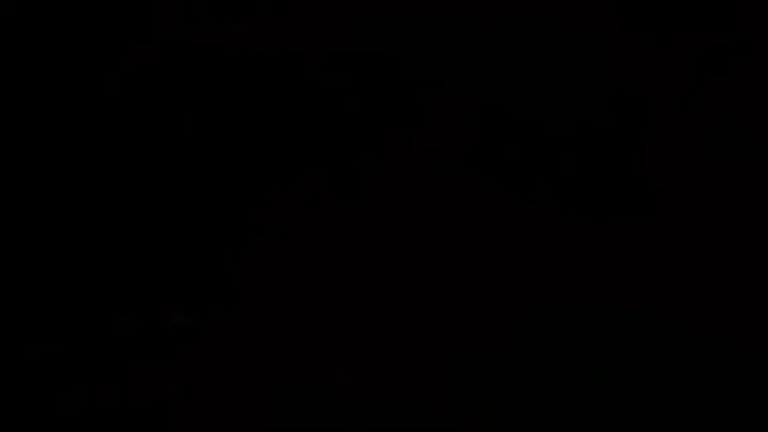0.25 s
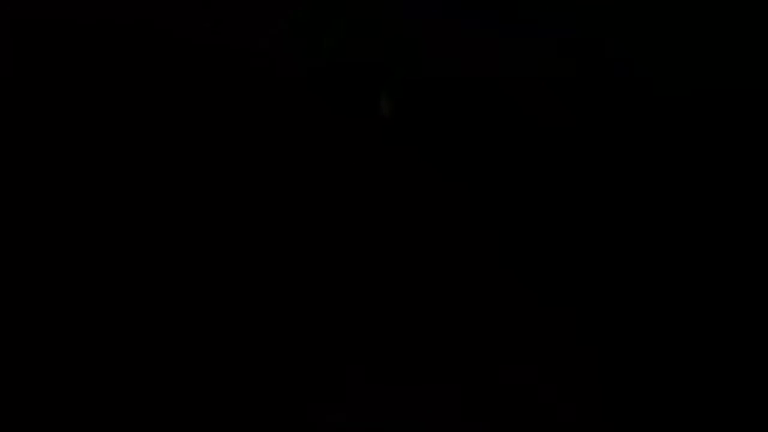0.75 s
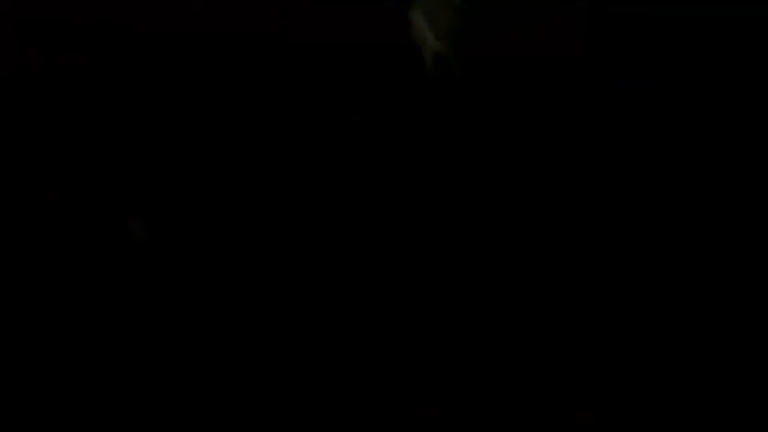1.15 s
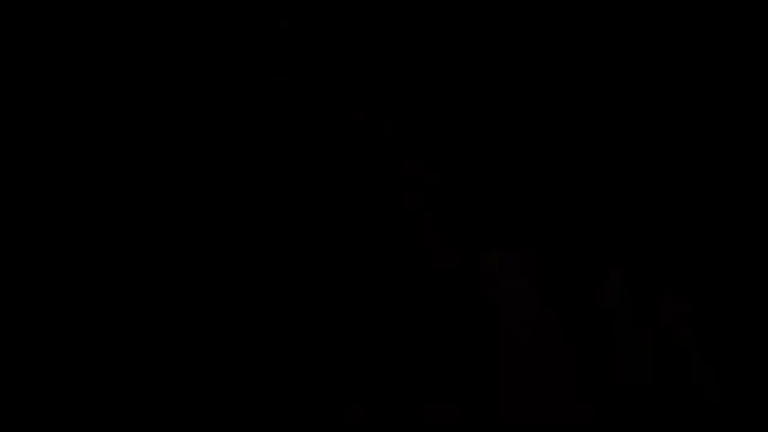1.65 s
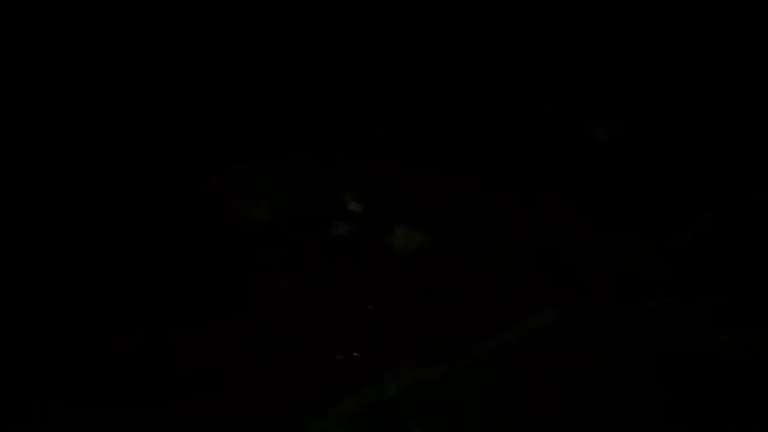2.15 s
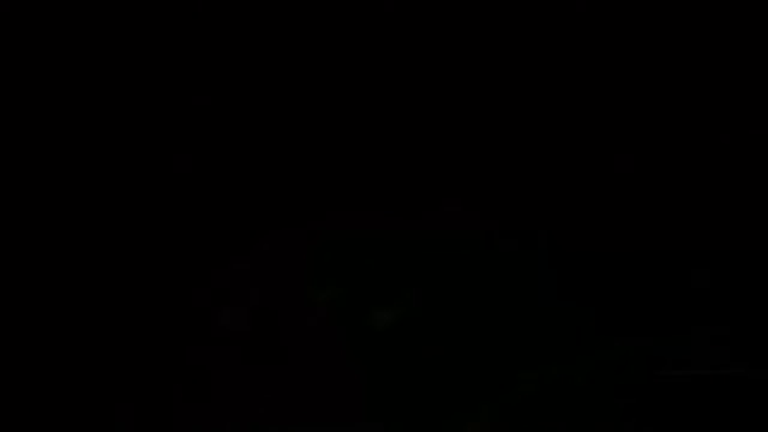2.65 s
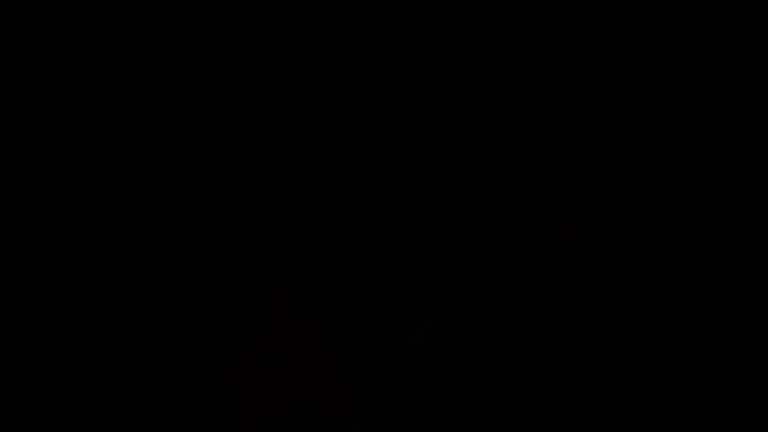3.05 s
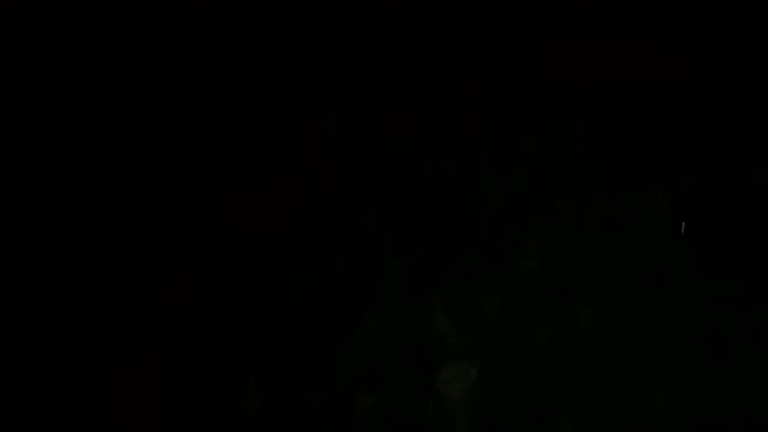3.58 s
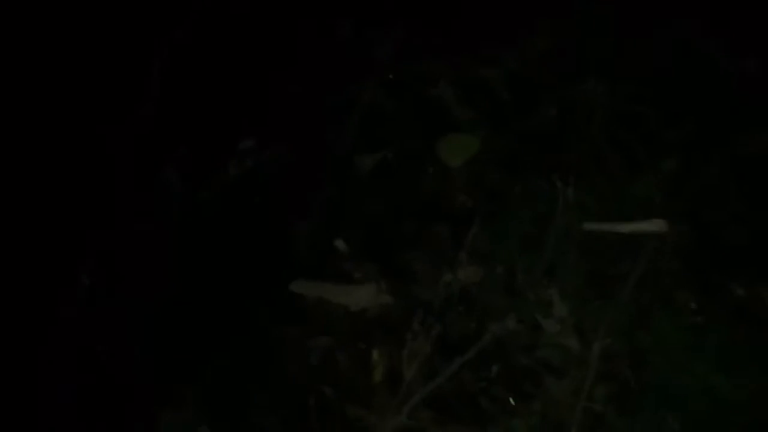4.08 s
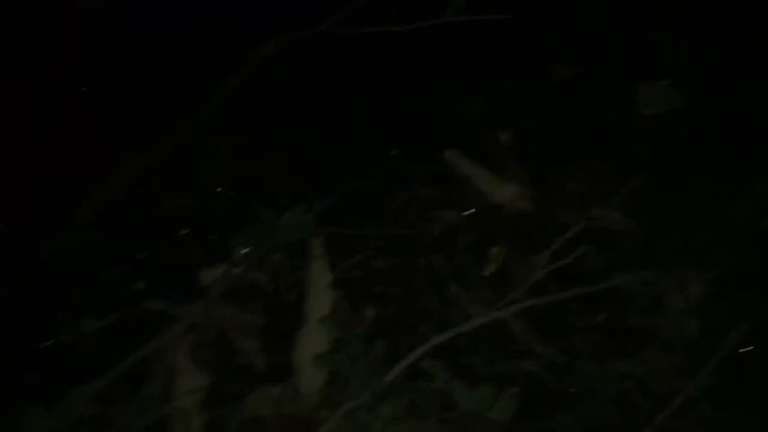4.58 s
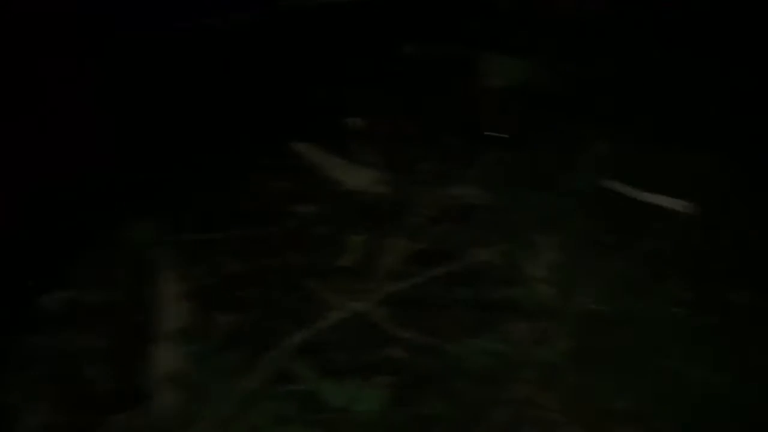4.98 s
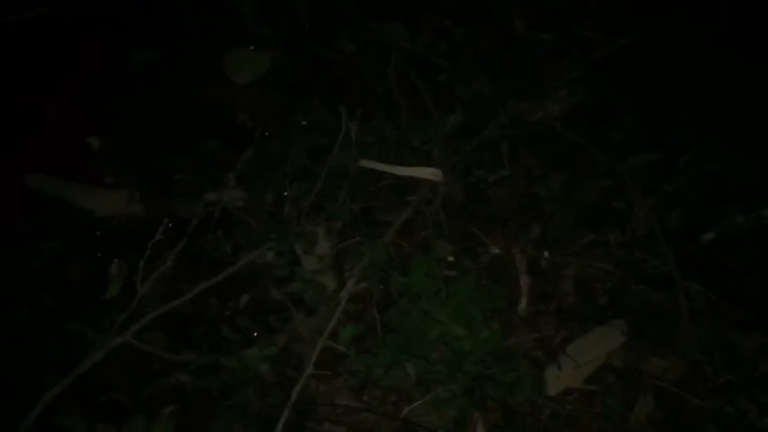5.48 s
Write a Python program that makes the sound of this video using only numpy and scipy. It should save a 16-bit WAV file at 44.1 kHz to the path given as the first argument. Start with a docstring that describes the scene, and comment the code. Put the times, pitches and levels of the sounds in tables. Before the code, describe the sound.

Night insects and small frogs rattle and shimmer continuously by a pond, katydid hiss pulsing twice a second, with handling taps and one sharp knock.

```python
"""Night by a pond: from the start insects and small frogs rattle in three registers, built from uneven ticks and noise.
Katydids swell in waves of hiss about twice a second, partly followed by the chorus; a cricket flutters a shrill band.
Far frogs snore in blurred bouts over a low rumble and faint air, and close callers chirp in snapping, ringing pulses.
Soon the hand on the microphone adds hollow taps and thuds, then muffled rubbing made of tiny slips.
Near the middle a close frog gives a short run of low pulses; later comes one sharp knock with damped modes."""
import sys
import numpy as np
from scipy import signal
from scipy.fft import rfft, irfft
from scipy.io import wavfile
from scipy.ndimage import uniform_filter1d

SR = 44100
rng = np.random.default_rng(int(sys.argv[2]) if len(sys.argv) > 2 else 0)


def wrap_up_sound(samples):
    """Save the sound to the file named by the first command line argument, as 16-bit audio."""
    columns = np.atleast_2d(samples).T
    # keep every value between -1 and 1, then stretch to whole-number steps
    tamed = np.clip(columns, -1, 1)
    steps = np.round(tamed * 32767).astype(np.int16)
    wavfile.write(sys.argv[1], SR, steps)


N = 252693
T = np.arange(N) / SR

# "Before trim" marks levels that the layer's own gain still shifts. Spectra give only the tone balance.

# Slow loudness of the chorus. Each row: time in seconds, then low, middle and high register in dB before trim.
CHORUS_LOUDNESS = [(0, -46.5, -43.5, -49), (0.2, -47.5, -47, -43.5), (0.34, -44.5, -46.5, -41),
                   (0.55, -46.5, -45.5, -45), (0.95, -46.5, -46.5, -47), (1.45, -44.5, -44, -47),
                   (1.62, -48, -45.5, -46), (1.8, -46, -44.5, -42), (2.0, -46.5, -46.5, -43),
                   (2.26, -45.5, -47.5, -44.5), (2.52, -48, -44, -44), (2.85, -44.5, -45, -49.5),
                   (3.06, -47, -46, -45.5), (3.38, -45, -46.5, -55), (3.62, -46.5, -45.5, -53),
                   (3.75, -45.5, -45, -52), (3.9, -47.5, -46, -52), (4.35, -45.5, -45.5, -52),
                   (4.54, -47.5, -47, -47), (4.75, -45, -44.5, -50), (5.05, -46.5, -48, -48.5),
                   (5.39, -43.5, -44.5, -48), (5.52, -48.5, -46.5, -45.5), (5.73, -48, -48, -49)]
# Spectra of the three registers of callers. Each row: frequency in Hz, relative level in dB.
LOW_CALL_SPECTRUM = [(1450, -53), (1700, -10.5), (1900, -0.5), (2080, 1.5), (2300, -4), (2600, -10.5),
                     (3100, -10)]
MIDDLE_CALL_SPECTRUM = [(2000, -23), (2450, -3), (2750, 1), (2930, 2.5), (3200, -3.5), (3500, -9.5),
                        (4000, -45)]
HIGH_CALL_SPECTRUM = [(3000, -27), (3500, -7.5), (3850, -4), (4070, -2), (4300, -7), (4650, -18.5),
                      (5400, -72)]

# Katydid waves, each lasting until the next row's lull.
# Each row: start in seconds, hiss in the lull in dB before trim, hiss at the crest in dB before trim.
KATYDID_WAVES = [(-0.2, -72, -56.5), (0.262, -71.5, -58.5), (0.7, -64, -56.5), (1.215, -68, -55.5),
                 (1.75, -68, -59), (2.16, -65.5, -56.5), (2.625, -67.5, -56.5), (3.135, -69, -57),
                 (3.64, -69, -56.5), (4.125, -66, -56), (4.6, -73.5, -56.5), (5.13, -72, -59),
                 (5.58, -71, -57.5), (6.0, -69, -57)]
WAVE_ROUND, WAVE_SKEW = 0.63, 0.94  # below 1: broad crests with brief lulls; a rise quicker than the fall
# Spectra of the katydids' hiss and rasp. Each row: frequency in Hz, relative level in dB.
HISS_SPECTRUM = [(7200, -73), (8400, -19.5), (9600, -17.5), (10500, -15.5), (11400, -6.5), (12500, -5),
                 (14000, -3), (15600, -1)]
RASP_SPECTRUM = [(3000, -11), (4000, 3), (4700, 0), (5000, -4), (5300, -1.5), (5900, -8), (6500, -6.5),
                 (6800, -18.5), (7050, -55), (7600, -69)]
# The rasp at middling effort, as the microphone turns. Each row: time in seconds, level in dB before trim.
RASP_LOUDNESS = [(0, -48), (0.7, -49), (1.4, -48), (2.0, -49), (2.9, -49), (3.7, -49), (4.3, -49.5),
                 (4.9, -49.5), (5.7, -49.5)]

# Loudness of the trilling cricket. Each row: time in seconds, level in dB before trim.
TRILL_LOUDNESS = [(0, -52.5), (0.6, -54.5), (1.4, -53.5), (1.6, -54), (3.1, -52.5), (4, -55.5), (5.73, -54)]
# Spectrum of the trill. Each row: frequency in Hz, relative level in dB.
TRILL_SPECTRUM = [(5600, -34), (6000, -3), (6270, -0.5), (6520, -0.5), (6750, -8.5), (6900, -17),
                  (7080, -47)]

# Bouts of frogs across the pond. Each row: start in seconds, end in seconds, full level in dB before trim.
FAR_FROG_BOUTS = [(-0.05, 0.18, -63.5), (0.33, 0.74, -62), (0.75, 2.05, -66), (2.31, 2.8, -59),
                  (2.78, 3.2, -58.5), (3.15, 4.02, -62), (4.22, 4.44, -59), (4.56, 4.92, -59.5),
                  (5.15, 5.8, -58.5)]
# Spectrum of the far frogs. Each row: frequency in Hz, relative level in dB.
FAR_FROG_SPECTRUM = [(950, -38), (1150, -11.5), (1330, 2), (1450, 4), (1650, 5), (1900, -10.5), (2300, -18)]

# Rumble of the unsteady hand. Each row: time in seconds, level in dB before trim.
SWAY_LOUDNESS = [(0, -65.5), (0.2, -68), (0.4, -72), (1.2, -75), (1.7, -71), (2.0, -74), (2.9, -80),
                 (3.2, -73.5), (3.98, -75), (4.08, -58), (4.3, -66), (4.8, -68.5), (5.25, -76), (5.45, -65),
                 (5.73, -67)]
# Spectrum of that rumble. Each row: frequency in Hz, relative level in dB.
SWAY_SPECTRUM = [(35, -17), (55, -5.5), (76, 2.5), (100, -6.5), (150, -12)]

# Spectrum of the background air. Each row: frequency in Hz, relative level in dB.
AIR_SPECTRUM = [(30, -12), (60, -1), (110, -6.5), (200, -4.5), (400, -8.5), (700, -10), (1100, -13.5),
                (3000, -5), (7500, -40.5), (9000, -20), (16000, -24)]

# The loudest close chirps. Each row: time in seconds, pitch in Hz, level in dB before trim.
LOUD_CHIRPS = [(0.054, 2106, -37.5), (0.178, 4070, -39.5), (0.314, 1980, -40), (0.36, 1915, -40),
               (0.487, 4040, -35), (0.604, 4120, -35), (0.679, 4070, -36), (0.71, 4050, -34),
               (0.83, 4100, -36.5), (0.856, 2120, -39.5), (0.916, 4110, -35.6), (1.026, 4050, -36),
               (1.357, 4070, -38), (1.539, 4010, -33.5), (1.558, 4010, -35), (1.713, 4020, -35.5),
               (1.736, 4030, -35.5), (1.852, 4030, -34.5), (1.928, 4080, -35.5), (2.082, 3930, -36.5),
               (2.113, 4010, -33), (2.229, 4040, -35.5), (2.386, 4000, -39), (2.465, 2950, -37),
               (3.344, 2780, -39), (3.456, 4090, -37.5), (3.47, 4100, -38.5), (3.752, 3000, -37.5),
               (4.273, 2910, -40), (4.311, 2960, -38), (4.353, 2034, -38), (4.487, 2134, -38.5),
               (4.725, 1970, -37.5), (5.041, 3890, -36.5), (5.056, 3940, -39.5), (5.385, 2920, -44),
               (5.401, 2040, -38.5), (5.424, 4080, -36.5), (5.634, 4120, -36.5)]
# Softer chirping from the nearest caller. Each row: start in seconds, end in seconds, typical level in dB before trim.
SOFT_CHIRP_BOUTS = [(0.051, 0.19, -47), (0.386, 1.13, -42), (1.239, 1.52, -41.5), (1.585, 2.06, -40),
                    (2.267, 2.51, -44), (2.65, 2.96, -44), (5.59, 5.69, -40)]
BOUT_HZ, BOUT_SPREAD_HZ, CHIRPS_PER_S, CHIRP_SPREAD_DB = 4040, 45, 27, 2.3

# Small taps and ticks. Each row: start in seconds, nominal peak in dB, pitch in Hz, time to fall by 60 dB in seconds.
TAP_EVENTS = [(0.122, -49, 586, 0.078), (2.775, -33.5, 1390, 0.016), (2.779, -54, 530, 0.046),
              (2.832, -53, 568, .08), (3.425, -55.5, 334, 0.09), (3.441, -53, 736, 0.018),
              (3.570, -42.5, 480, 0.016), (3.603, -51, 332, 0.038), (4.144, -44, 1280, 0.033),
              (4.149, -50, 582, 0.081), (4.264, -56, 610, 0.055), (4.306, -50, 532, .055),
              (4.376, -41, 805, 0.03), (4.444, -57, 1040, 0.04), (5.47, -56, 199, 0.067),
              (5.539, -56, 720, 0.055)]

# Handling bumps. Each row: start in seconds, envelope peak in dB, pitch in Hz.
BUMP_EVENTS = [(0.18, -53.5, 69), (0.817, -64, 73), (1.63, -57, 74.6), (3.094, -58.5, 75), (3.37, -67, 75),
               (3.464, -62, 70.4), (3.615, -59, 72), (4.064, -48.5, 53.5), (4.461, -63, 68),
               (4.61, -69, 80), (4.78, -67, 75), (5.393, -60, 64.3), (5.53, -61, 80)]

# The grip rubs on the casing. Each row: start in seconds, end in seconds, full level in dB before trim.
RUB_BOUTS = [(1.12, 1.55, -66), (1.42, 1.72, -63), (1.66, 1.9, -68), (2.1, 2.62, -67), (2.6, 2.98, -68),
             (3.3, 3.5, -70), (3.48, 3.75, -64.5), (4.92, 5.08, -69)]
# Spectrum of the rubbing. Each row: frequency in Hz, relative level in dB.
RUB_SPECTRUM = [(130, -26), (200, -10.5), (260, 3), (360, 2), (470, -3), (590, 0), (720, -18.5),
                (1100, -27)]

# The near frog's snore swells and slows. Each row: time in seconds, pulse peak in dB, pulses per second.
SNORE_COURSE = [(2.415, -42.5, 62.4), (2.465, -40, 61.8), (2.58, -38.2, 60.6), (2.685, -38.4, 58)]

KNOCK_S = 4.0565  # when the sharp knock starts
# What the knock rings with. Each row: frequency in Hz, level in dB before trim, time to fall by 60 dB in seconds.
KNOCK_RING = [(120, -42, .17), (162, -49, 0.21), (413, -41.5, 0.084), (570, -43.5, 0.12),
              (765, -33.5, 0.093), (940, -44, 0.046), (1100, -40, 0.1), (1410, -31.5, 0.036),
              (1790, -28, 0.033), (3470, -20, 0.011)]
# Spectra of the knock's crack and scuff. Each row: frequency in Hz, relative level in dB.
CRACK_SPECTRUM = [(200, -19), (500, -13), (900, 8), (1800, -1), (2600, -2), (3400, 1), (4200, 3),
                  (5200, -10), (7000, -11)]
SCUFF_SPECTRUM = [(70, -6), (120, 6), (250, -10), (450, -1), (800, -5), (1400, -7), (2500, -24),
                  (8000, -17), (12000, -23)]


def gain_of(db):
    """Decibels to amplitude."""
    return 10 ** (np.asarray(db) / 20)


def evened(x):
    """Scales to rms 1."""
    return x / np.sqrt(np.mean(x ** 2) + 1e-20)


def steadied(x, seconds):
    """Levels the sound to about rms 1 over a sliding window of this length; faster flutter stays."""
    window = np.hanning(int(seconds * SR))
    energy = signal.fftconvolve(x ** 2, window, "same")
    weight = signal.fftconvolve(np.ones(N), window, "same")
    return x / np.sqrt(abs(energy / weight) + 1e-20)


def level(rows, order=1):
    """One dB column of a curve as a gain at every sample."""
    rows = np.asarray(rows)
    return gain_of(np.interp(T, rows[:, 0], rows[:, order]))


def swells(rows, fade_s):
    """A gain that swells and fades once per row; bouts shorter than two fades stop short of full level."""
    gain = np.zeros(N)
    for start, end, db in rows:
        from_edge = np.minimum(T - start, end - T)
        gain += gain_of(db) * np.sin(np.pi / 2 * np.clip(from_edge / fade_s, 0, 1))
    return gain


def colour(x, points):
    """Filters by a spectrum that falls away at 90 dB per octave beyond its ends, then evens the result."""
    hz, db = np.transpose(points)
    octave = np.log2(np.fft.rfftfreq(N, 1 / SR) + 1)
    knots = np.log2(hz)
    beyond = abs(octave - np.clip(octave, knots[0], knots[-1]))
    response = gain_of(np.interp(octave, knots, db) - 90 * beyond)
    return evened(irfft(rfft(x) * response, N))


def drift(seconds):
    """A slow random curve of rms 1, with a new value drawn at this interval."""
    knots = np.arange(0, T[-1] + 2 * seconds, seconds)
    return evened(np.interp(T, knots, rng.standard_normal(len(knots))))


def patchy(x, depth_db, size=2048, count=3):
    """Narrow bands flare and fade at random, giving the noise a grainy, faintly tonal texture."""
    overlap = size * 3 // 4
    bands = signal.stft(x, nperseg=size, noverlap=overlap)[2]
    across_pitch = uniform_filter1d(rng.standard_normal(bands.shape), count, axis=0)
    patches = evened(uniform_filter1d(across_pitch, 2 * count, axis=1))
    return signal.istft(bands * gain_of(depth_db * patches), nperseg=size, noverlap=overlap)[1][:N]


def add(mix, s, sound):
    """Mixes a sound in at time s."""
    part = mix[max(round(s * SR), 0):][:len(sound)]
    part += sound[:len(part)]


def waves(lead_s=0):
    """The katydids' effort as a gain: an arch in decibels from each lull to the next."""
    start, lull_db, crest_db = np.transpose(KATYDID_WAVES)
    turns = np.interp(T + lead_s, start, np.arange(len(start)))
    base_db = np.interp(T + lead_s, start, lull_db)
    arch = np.maximum(np.sin(np.pi * (turns % 1) ** WAVE_SKEW), 0) ** WAVE_ROUND
    return gain_of(base_db + arch * (crest_db[turns.astype(int)] - base_db))


def crowd(spectrum, rate, fade_s, direct, wash, patchy_db, count=5):
    """Callers tick at their own uneven rates; each tick trails off in noise as it scatters through the plants."""
    ticks = np.zeros(N)
    for pace in np.geomspace(.7, 1.4, count):
        turns = np.cumsum(rate * pace * (1 + .15 * drift(.05))) / SR + rng.random()
        strength = gain_of(1.7 * np.tanh(drift(.12)))
        ticks += np.diff(np.floor(turns), prepend=0) * strength
    ticks = evened(ticks)
    keep = np.exp(-2 / (fade_s * SR))  # squared decay, since it smooths power
    scatter_power = signal.lfilter([1 - keep], [1, -keep], ticks ** 2)
    scatter = np.sqrt(scatter_power + wash ** 2) * rng.standard_normal(N)
    sound = direct * ticks + scatter
    return steadied(colour(patchy(sound, patchy_db), spectrum), 0.3)


def chorus(low_follow=.36, middle_follow=0.3, high_follow=0.19, lead_s=0.024):
    """Three registers of rattling callers, which partly follow the katydid waves, a little ahead of them."""
    effort = waves(lead_s)
    low = crowd(LOW_CALL_SPECTRUM, rate=27, fade_s=0.023, direct=0.54, wash=0.94, patchy_db=2.5)
    middle = crowd(MIDDLE_CALL_SPECTRUM, rate=27, fade_s=0.019, direct=0.55, wash=0.85, patchy_db=3.5)
    high = crowd(HIGH_CALL_SPECTRUM, rate=28, fade_s=0.01, direct=0.66, wash=0.26, patchy_db=3.5)
    low *= gain_of(0.47) * level(CHORUS_LOUDNESS, order=1) * evened(effort ** low_follow)
    middle *= gain_of(0.27) * level(CHORUS_LOUDNESS, order=2) * evened(effort ** middle_follow)
    high *= gain_of(-2.0) * level(CHORUS_LOUDNESS, order=3) * evened(effort ** high_follow)
    return low + middle + high


def katydids(follow=0.44, lead_s=0.025):
    """File teeth click by the thousand: a very high hiss swells in waves, and a lower rasp follows it partly."""
    def teeth(per_s, wash):
        """Random tooth strikes in their own diffuse wash."""
        strikes = rng.standard_normal(N) * (rng.random(N) < per_s / SR)
        return evened(strikes) + wash * rng.standard_normal(N)
    hiss = waves() * colour(patchy(teeth(4000, 1.9), depth_db=3.5, size=1024), HISS_SPECTRUM)
    rasp = colour(patchy(teeth(1500, 1.5), depth_db=2.5), RASP_SPECTRUM)
    rasp *= evened(waves(lead_s) ** follow) * level(RASP_LOUDNESS)
    return gain_of(0.9) * hiss + gain_of(3.5) * rasp


def cricket(stroke_hz=88, depth=0.23):
    """Fast wing strokes flutter a narrow, shrill band."""
    turns = np.cumsum(stroke_hz * (1 + 0.0086 * drift(0.19))) / SR
    strokes = 1 + depth * np.cos(2 * np.pi * turns)
    trill = steadied(colour(strokes * rng.standard_normal(N), TRILL_SPECTRUM), 0.4)
    return gain_of(-0.5) * level(TRILL_LOUDNESS) * trill


def far_frogs(lull_db=-69, fade_s=0.064):
    """Overlapping snores, blurred by distance, stand out in bouts over a faint steady calling."""
    calling = np.hypot(gain_of(lull_db), swells(FAR_FROG_BOUTS, fade_s))
    snores = crowd(FAR_FROG_SPECTRUM, rate=58, fade_s=0.014, direct=0.53, wash=0.55, patchy_db=3.5, count=2)
    return gain_of(2.0) * calling * snores


def sway(lumpy_db=3.0):
    """A lumpy low rumble from the moving hand, made of filtered noise."""
    rumble = colour(rng.standard_normal(N), SWAY_SPECTRUM)
    return gain_of(-2.0 + lumpy_db * drift(.06)) * level(SWAY_LOUDNESS) * rumble


def air():
    """A faint, gently wavering background of patchy noise."""
    wavering = gain_of(-65.5 + 1.0 * drift(0.246))
    return wavering * colour(patchy(rng.standard_normal(N), depth_db=3.0), AIR_SPECTRUM)


def soft_chirps(jitter_s=.004, clear_s=.018):
    """Rows of (s, Hz, dB) at an uneven pace through each bout, leaving room for the loud chirps."""
    loud_s = np.array(LOUD_CHIRPS)[:, 0]
    rows = []
    for start, end, db in SOFT_CHIRP_BOUTS:
        beats = np.arange(start, end, 1 / CHIRPS_PER_S)
        for s, (late, sharp, strong) in zip(beats, rng.standard_normal(size=(40, 3))):
            if abs(loud_s - s).min() > clear_s:
                hz = BOUT_HZ + BOUT_SPREAD_HZ * sharp
                rows.append((s + jitter_s * late, hz, db + CHIRP_SPREAD_DB * strong))
    return rows


def close_chirps(rise_s=0.0013, snap=0.11, snap_s=0.00032, echo=0.81, echo_fade_s=0.013, count=6):
    """Each chirp is one snapping, ringing pulse with a fading stutter of pulses behind it."""
    out, t = np.zeros(N), np.arange(int(.04 * SR)) / SR
    for s, hz, db in list(LOUD_CHIRPS) + soft_chirps():
        gap, size, phase = rng.random((3, count))
        delays = np.cumsum(0.00246 + 0.0022 * gap)
        delays -= delays[0]
        sizes = np.where(delays > 0, echo * (.5 + size) * np.exp(-delays / echo_fade_s), 1)
        age = np.maximum(t - delays[:, None], 0)
        body = age / rise_s * np.exp(1 - age / rise_s)
        attack = (age / snap_s * np.exp(1 - age / snap_s)) ** 2
        pulses = (body + snap * attack) * np.sin(2 * np.pi * (hz * t + phase[:, None]))
        add(out, s - .0018, gain_of(db) * (sizes @ pulses))  # starts early so the swell lands near s
    # such small bodies radiate only in a limited band
    band = signal.butter(2, [1400, 5600], "band", fs=SR, output="sos")
    return gain_of(4) * signal.sosfilt(band, out)


def taps(rise_s=0.00063, grit=0.35, corner_hz=1000):
    """Each tap has one hollow pitch and a little dull grit under the same decay."""
    out, t = np.zeros(N), np.arange(int(.15 * SR)) / SR
    for s, db, hz, t60 in TAP_EVENTS:
        dull = signal.butter(2, [hz / 2, max(corner_hz, 1.46 * hz)], "band", fs=SR)
        dust = evened(signal.lfilter(*dull, rng.standard_normal(len(t))))
        envelope = gain_of(db - 60 * t / t60) * (1 - np.exp(-t / rise_s))
        add(out, s, envelope * (np.sin(2 * np.pi * hz * t) + grit * dust))
    return out


def bumps(rise_s=0.016):
    """The hand shifts and the casing thuds for a few cycles."""
    out, t = np.zeros(N), np.arange(int(.25 * SR)) / SR
    envelope = t / rise_s * np.exp(1 - t / rise_s)
    for s, db, hz in BUMP_EVENTS:
        add(out, s, gain_of(db) * envelope * np.sin(2 * np.pi * hz * t))
    return out


def rubbing(slips_per_s=200, smooth=0.5, fade_s=0.14, lumpy_db=2):
    """Fingers creep over the casing in many tiny, muffled slips, with uneven pressure."""
    slips = evened(rng.standard_normal(N) * (rng.random(N) < slips_per_s / SR))
    contact = slips + smooth * rng.standard_normal(N)
    grain = steadied(colour(patchy(contact, depth_db=6.5), RUB_SPECTRUM), 0.16)
    pressure = gain_of(0.1 + lumpy_db * drift(.04))
    return pressure * swells(RUB_BOUTS, fade_s) * grain


def near_frog(throat_hz=1410, width_s=.0021, echo=0.17, echo_s=0.00533):
    """A run of soft-edged pulses from the vocal sac, each with an echo off the bank."""
    out, t = np.zeros(N), np.arange(-int(0.013 * SR), int(.015 * SR)) / SR
    times, db, rate = np.transpose(SNORE_COURSE)
    s = times[0]
    while s < times[-1]:
        pitch_hz = throat_hz * (1 + .01 * rng.standard_normal())
        pulse = np.exp(-(t / width_s) ** 2) * np.cos(2 * np.pi * pitch_hz * t)
        pulse *= gain_of(np.interp(s, times, db))
        add(out, s + t[0], pulse)
        add(out, s + t[0] + echo_s, echo * pulse)
        s += 1 / np.interp(s, times, rate)
    return out


def knock(crack_db=-30, crack_s=0.002, rebound=0.68, rebound_s=0.00322,
          scuff_db=-45, scuff_s=0.013, settle=0.25, settle_s=0.13, rise_s=0.00019):
    """A crack, a quick rebound and a few damped modes, with a scuff that settles."""
    out, t = np.zeros(N), np.arange(int(.3 * SR)) / SR
    ring = np.zeros(len(t))
    for hz, db, t60 in KNOCK_RING:
        ring += gain_of(db - 60 * t / t60) * np.sin(2 * np.pi * (hz * t + rng.random()))
    blows = np.exp(-t / crack_s) + rebound * (t > rebound_s) * np.exp(-abs(t - rebound_s) / crack_s)
    crack = gain_of(crack_db) * blows * colour(rng.standard_normal(N), CRACK_SPECTRUM)[:len(t)]
    # a blunt contact carries little above 5 kHz
    blunt = signal.butter(3, 5200, fs=SR, output="sos")
    blow = signal.sosfilt(blunt, gain_of(-4) * ring + crack)
    settling = np.exp(-t / scuff_s) + settle * np.exp(-t / settle_s)
    scuff = gain_of(scuff_db) * settling * colour(rng.standard_normal(N), SCUFF_SPECTRUM)[:len(t)]
    add(out, KNOCK_S, (blow + scuff) * (1 - np.exp(-t / rise_s)))
    return out


def scene():
    """Everything around the pond, in one channel."""
    animals = chorus() + katydids() + cricket() + far_frogs() + close_chirps() + near_frog()
    handling = sway() + taps() + bumps() + rubbing() + knock()
    return (animals + handling + air())[None]


def record(dry, edge_hz=15780):
    """The recorder's band limit: a steep low-pass that leaves the timing in place."""
    low_pass = signal.firwin(1023, edge_hz, window=("kaiser", 9), fs=SR)
    return signal.oaconvolve(dry, low_pass[None], "same")


dry = scene()
out = record(dry)
wrap_up_sound(out)
```